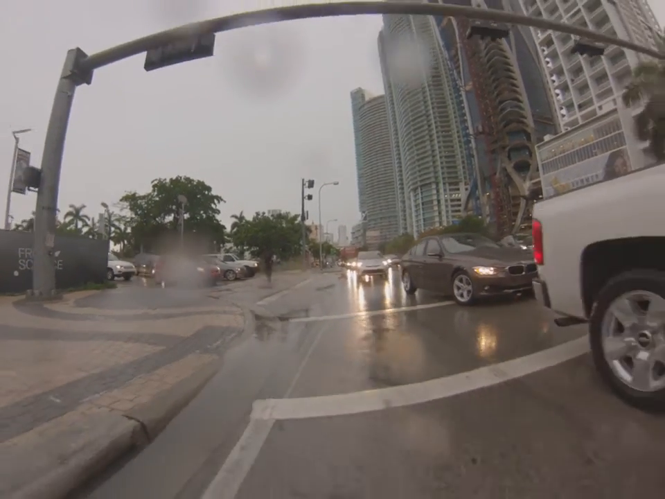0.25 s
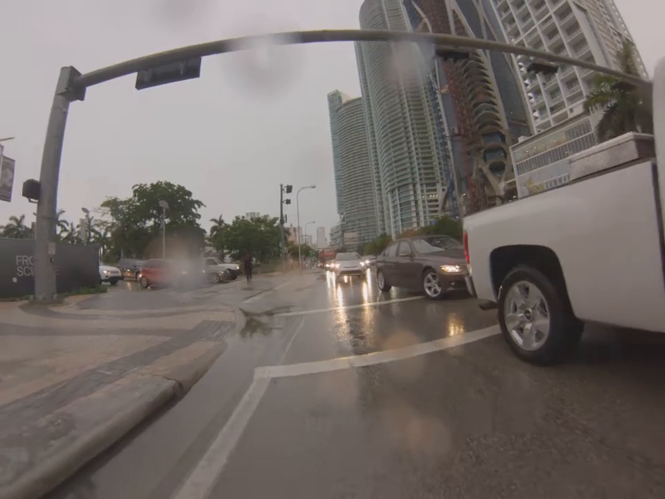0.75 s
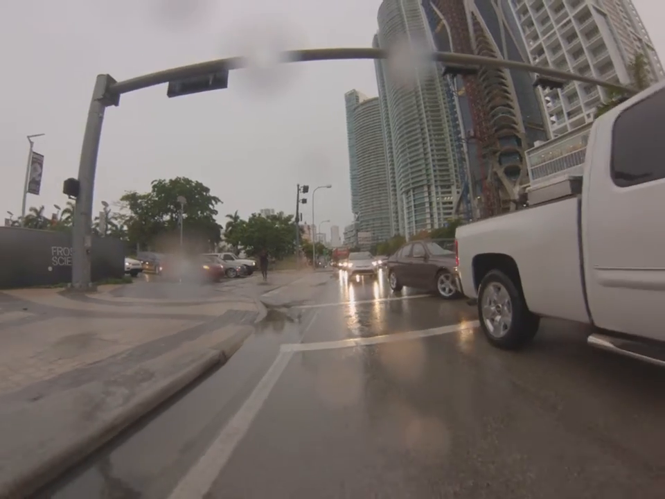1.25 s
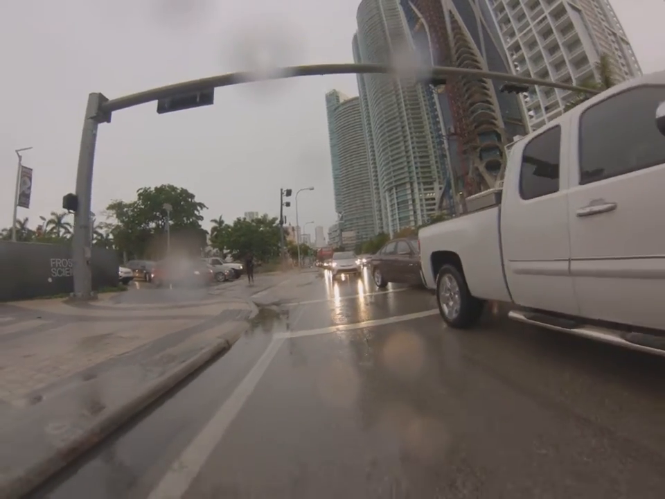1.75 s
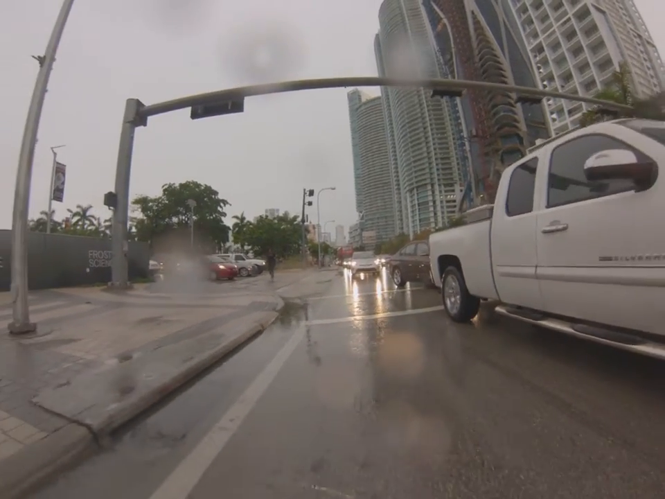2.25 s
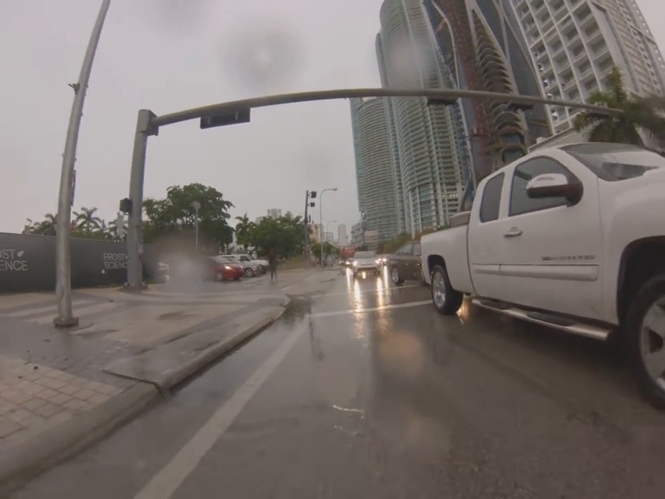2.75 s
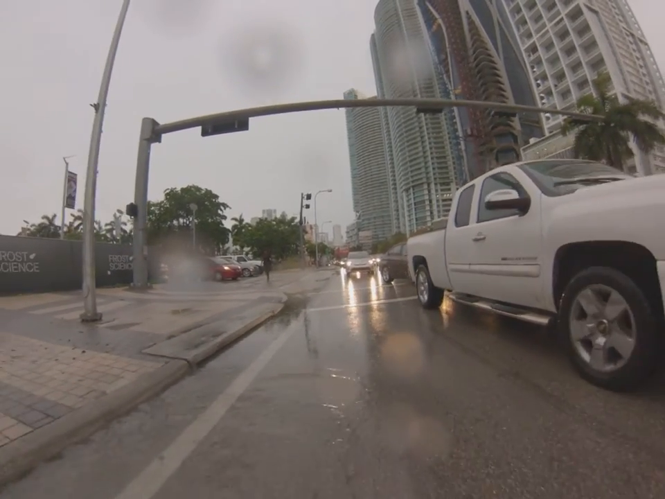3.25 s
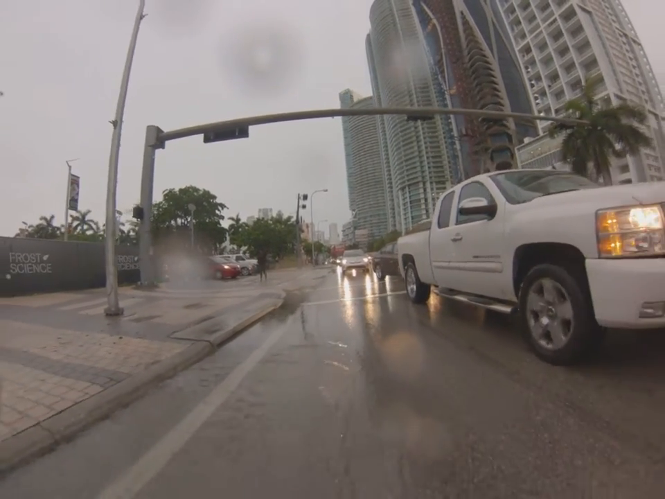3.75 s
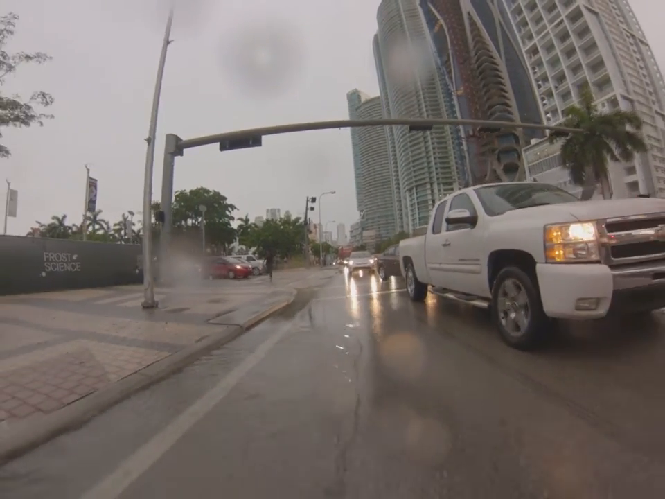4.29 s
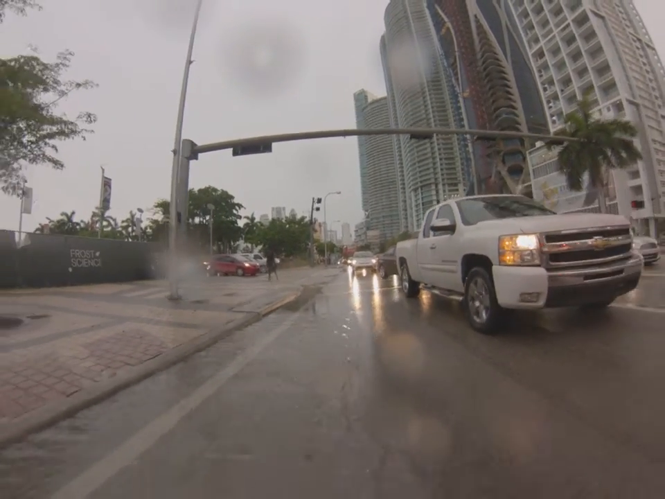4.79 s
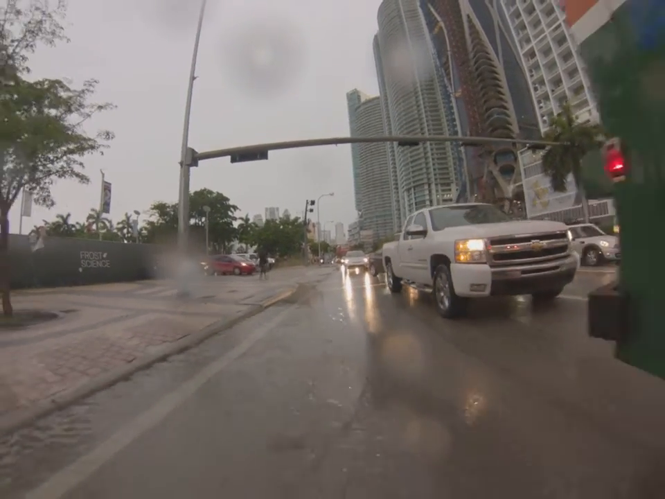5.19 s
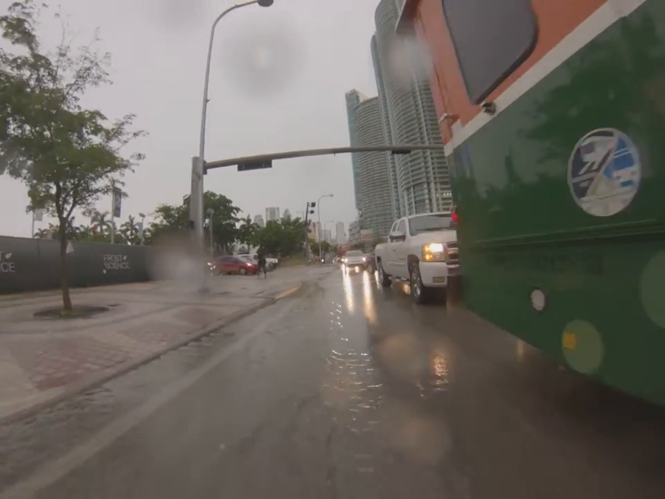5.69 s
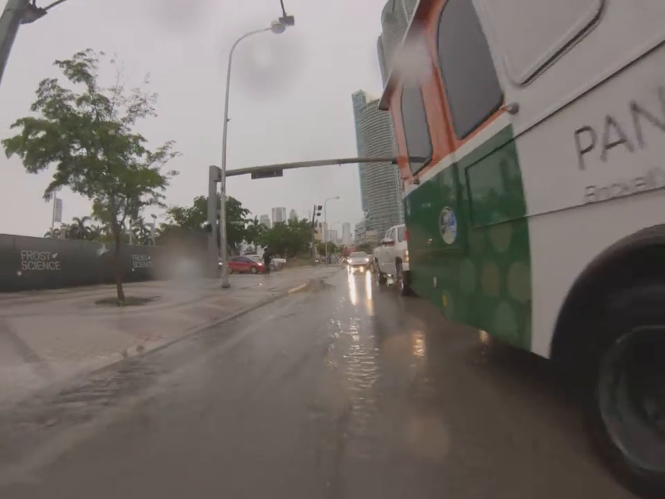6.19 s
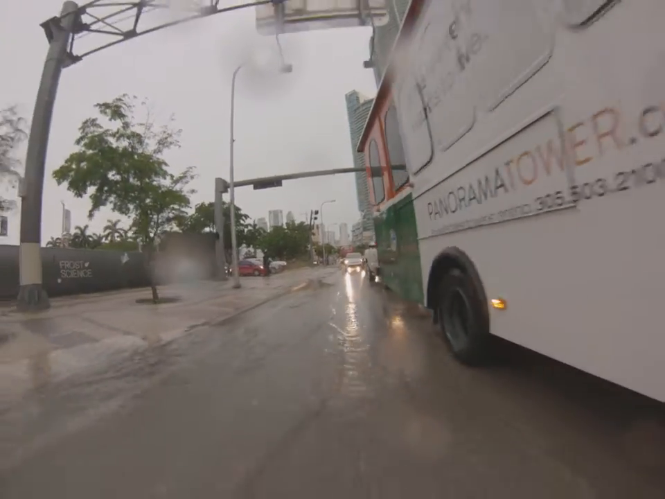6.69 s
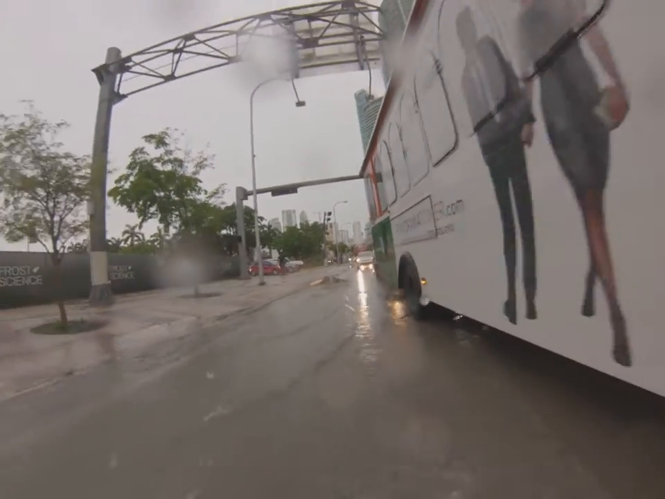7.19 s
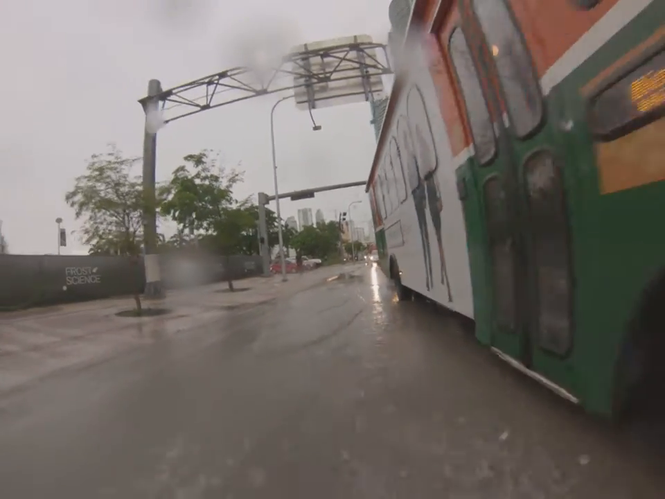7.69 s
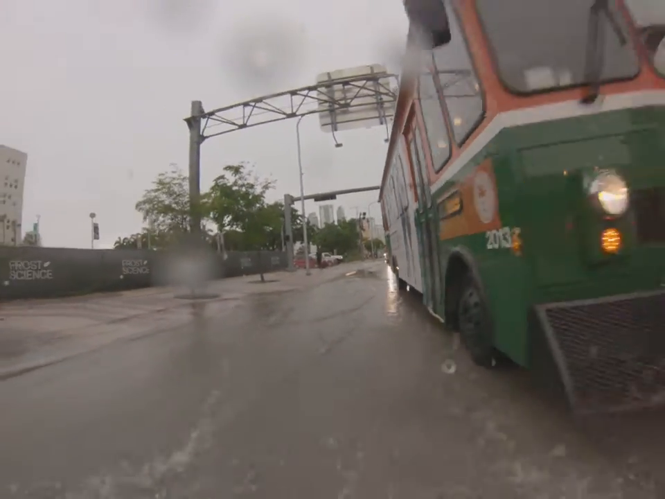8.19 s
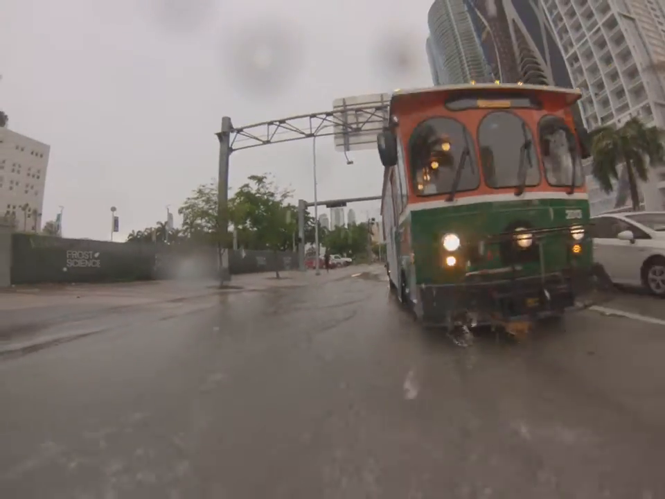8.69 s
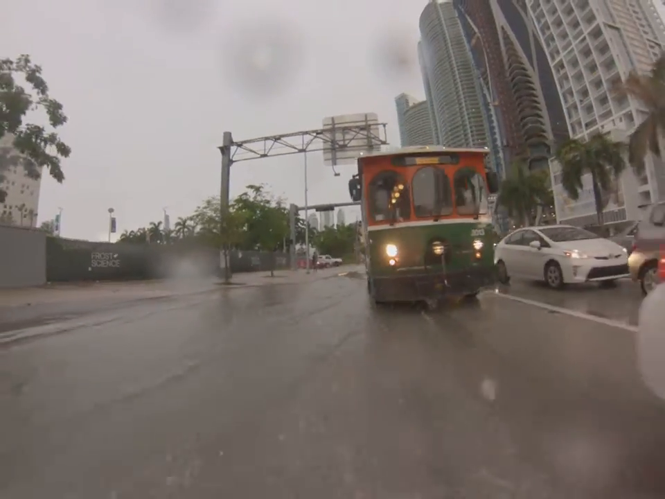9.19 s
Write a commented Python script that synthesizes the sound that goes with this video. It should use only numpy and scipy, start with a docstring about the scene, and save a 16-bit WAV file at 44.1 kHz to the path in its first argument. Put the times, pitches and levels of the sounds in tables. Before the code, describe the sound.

Close, booming motorcycle engine settles to idle, revs briefly, then rides off slowly through water as the microphone mount knocks and creaks.

```python
"""On a flooded street, a V-twin motorcycle is heard from a camera housing mounted on the bike.
It winds down to idle, gets a few small blips and one big one, then pulls away slowly. Periodic impulses
excite resonators: firings boom in the pipe, knocks thud in the frame, valves clatter in the crankcase.
Bodywork hums, a thin whine wavers at idle, wind rumbles and tyres hiss through the water.
Drops tick on the housing, which creaks at the hardest shakes and now and then snaps."""
import sys
import numpy as np
from scipy import signal
from scipy.io import wavfile
from scipy.ndimage import uniform_filter1d

SR = 44100
rng = np.random.default_rng(int(sys.argv[2]) if len(sys.argv) > 2 else 0)


def int16_out(signal):
    """Quantize to a 16-bit WAV file."""
    q = np.round(np.clip(np.atleast_2d(signal).T, -1, 1) * 32767)
    wavfile.write(sys.argv[1], SR, q.astype(np.int16))


N = 416744
T = np.arange(N) / SR

# Levels in all tables are relative: each layer applies its own gain.
# knocks in one four-stroke cycle: place_cycles, idle_thud_db, revved_thud_db, clack_db, jitter_s
CYCLE_KNOCKS = [(.01, -12, -13, -11, .0003), (.09, -16, -18, -9, .0003), (.26, -15, -5, -10, .0009),
                (.31, -11, -12, -7, .0002), (.385, -7, -6, -1, .0003), (.7, 2, 1, -13, .00005),
                (.745, -6, -18, -6, .0001), (.785, -3, -13, -8, .0001), (.85, -8, -11, -9, .0001),
                (.935, -11, -15, -10, .0002)]
# the housing's bright response to ticks and scrapes: frequency_hz, gain_db
SHELL_SPECTRUM = [(500, -23.5), (1500, 5.5), (3000, 6), (5000, 3), (10000, -4.5), (15000, -15.5)]


def gain_of(db):
    """Amplitude ratio of a level in decibels."""
    return 10 ** (np.asarray(db) / 20)


def unit_rms(x):
    """Normalises the overall rms to 1."""
    return x / np.sqrt(np.mean(x ** 2) + 1e-20)


def steadied(x, size=8000):
    """Holds the short-term rms at 1 and keeps the single beats."""
    power = uniform_filter1d(uniform_filter1d(x ** 2, size), size)
    return x / np.sqrt(abs(power) + 1e-12)


def curve(table, column=1):
    """Interpolates one column of a time table at every sample."""
    columns = np.transpose(table)
    return np.interp(T, columns[0], columns[column])


def colour(x, spectrum, size=32768):
    """Minimum-phase filter with the given magnitude spectrum."""
    hz, db = np.transpose(spectrum)
    log_hz = np.log(abs(np.fft.fftfreq(size, 1 / SR)) + 1)
    log_gain = np.log(gain_of(np.interp(log_hz, np.log(hz), db)))
    response = np.fft.ifft(np.exp(np.conj(signal.hilbert(log_gain)))).real
    return signal.oaconvolve(x, response[:size // 2])[:N]


def resonate(x, modes):
    """Modal superposition: each mode is a band-pass applied twice."""
    out = np.zeros(N)
    for hz, width_hz, db in modes:
        b, a = signal.iirpeak(hz, hz / (2 * width_hz), SR)
        out += gain_of(db) * signal.lfilter(b, a, signal.lfilter(b, a, x))
    return out


def noise():
    """White Gaussian noise."""
    return rng.standard_normal(N)


def wander(hz):
    """Random modulation of rms 1, mostly below the given rate."""
    return unit_rms(np.interp(2 * hz * T, np.arange(1024), rng.standard_normal(1024)))


def beats(turns, place, scatter_db, jitter_s):
    """Quasi-periodic impulses: one per engine cycle, scattered in strength and timing."""
    at = np.flatnonzero(np.diff(np.floor(turns - place)) > 0)
    strength, lateness = rng.standard_normal((256, 2))[:len(at)].T
    at = np.clip(at + (lateness * jitter_s * SR).astype(int), 0, N - 1)
    out = np.zeros(N)
    out[at] = gain_of(scatter_db * np.minimum(strength, 1.3))
    return out


def strikes(table, column=1, delay_s=0):
    """One impulse per row, with its level in dB taken from the given column."""
    out = np.zeros(N)
    for row in table:
        out[round((row[0] + delay_s) * SR)] = gain_of(row[column])
    return out


def rattled(impulses, decay_s, bed):
    """Each impulse starts exponentially decaying noise, adding in power to a steady bed."""
    power = signal.lfilter([1], [1, -np.exp(-2 / (decay_s * SR))], impulses ** 2)
    return np.sqrt(power + bed ** 2) * noise()


def bursts(impulses, sigma_s, size):
    """Spreads each impulse into a noise burst with a Gaussian envelope."""
    return signal.oaconvolve(impulses, signal.windows.gaussian(size, sigma_s * SR), "same") * noise()


def rider():
    """Engine speed and throttle: each blip winds the engine up, then it coasts back."""
    # winding down, idling, pulling away: time_s, speed_rpm, throttle_fraction
    ride = [(0, 2017.6, .5), (.3, 1584.2, 0), (.6, 1358.9, 0), (1.3, 1331.8, 0), (1.8, 1324.8, 0),
            (2.5, 1330.9, 0), (3, 1282.5, 0), (3.3, 1334, .03), (3.9, 1359.2, .09), (4.3, 1351, .13),
            (4.55, 1421.2, .2), (4.85, 1509.3, .48), (5.1, 1725.1, .7), (5.3, 1760.4, .85),
            (5.6, 1703.8, .87), (6.3, 1640.1, .9), (6.7, 1687.3, .76), (7.4, 1816.3, .55), (8, 1869.5, .6),
            (8.8, 1939.5, .65), (9.45, 1978.4, .7)]
    # added twists of the throttle: start_s, length_s, gained_rpm, opening_fraction
    blips = [(1.17, .15, 20, .5), (3.265, .373, 259, .5), (3.823, .46, 207, .6), (4.541, .349, 639, .5)]
    twist_s, rev_up_s, coast_rpm_per_s = .06, .189, 2200
    rpm, throttle = curve(ride), curve(ride, 2)
    for start, length, gained_rpm, opening in blips:
        end = start + length
        rise = gained_rpm * (T - start) / rev_up_s
        fall = gained_rpm - coast_rpm_per_s * (T - end)
        rpm += np.clip(np.minimum(rise, fall), 0, gained_rpm)
        throttle += opening * np.clip(1 + np.minimum(T - start, end - T) / twist_s, 0, 1)
    return rpm, np.clip(throttle, 0, 1)


def exhaust(turns, throttle, pace):
    """Pipe resonance: two unevenly spaced firings drive a boom, with gas rumble and a bark under load."""
    # spectra of the pipe, the bark and the rough gas flow: frequency_hz, gain_db
    pipe_spectrum = [(12, -51.5), (22, -37), (30, -9), (40, 4), (50, 2), (59, 10.5), (68, 0.5), (80, -13.5),
                     (92, -11), (112, -22.5), (145, -26.5), (200, -34.5), (400, -53), (900, -100.5)]
    bark_spectrum = [(150, -23), (270, -5), (450, 10.5), (560, 1), (720, -14), (850, -3), (1020, -5.5),
                     (1130, -4), (1400, 1), (2400, -27), (4000, -52.5)]
    rumble_spectrum = [(50, -30), (95, -4), (135, 5.5), (190, -2), (260, -16), (600, -60)]
    # envelope of the boom: time_s, level_db
    boom_levels = [(0.0, -30), (0.2, -31.5), (0.4, -26.5), (0.65, -30), (1.3, -23.5), (1.38, -27.5),
                   (3.22, -27), (3.38, -21), (3.53, -29), (3.8, -20.5), (4.38, -27), (4.58, -22),
                   (4.95, -20.5), (5.1, -26.5), (5.32, -23), (7.0, -26.5), (9.38, -24.5), (9.45, -26)]
    front_cycles, gap_cycles, pipe_lag_s, bark_lag_s = .93, .385, .009, .016
    front = beats(turns, front_cycles, scatter_db=.8, jitter_s=.0002)
    rear = beats(turns, front_cycles + gap_cycles, scatter_db=.8, jitter_s=.0002)
    firings = front + rear * np.interp(throttle, [.35, .9], [.95, .5])  # the front leads under load
    boom_db = curve(boom_levels)
    boom = np.roll(steadied(colour(firings, pipe_spectrum)), round(pipe_lag_s * SR))
    boom *= gain_of(boom_db - 2.5 + .5 * wander(hz=8.4))
    puffs = unit_rms(firings ** 2) + 1.2 * unit_rms(rattled(firings ** 2, decay_s=.0042, bed=.018))
    bark = np.roll(steadied(colour(puffs, bark_spectrum)), round(bark_lag_s * SR))
    bark *= gain_of(-74.5 + 16.5 * throttle + 6 * pace)
    rumble = steadied(colour(noise(), rumble_spectrum)) * gain_of(-48.5 + 1.31 * (boom_db + 20))
    return boom + rumble + bark


def frame(turns, rev_octaves, throttle, pace):
    """Impact excitation: engine knocks ring frame and fairing, their balance shifting with speed."""
    # response of the frame: frequency_hz, gain_db
    frame_spectrum = [(70, -29.5), (130, -15.5), (190, -1), (250, 2.5), (330, 2.5), (440, 3.5), (540, -16),
                      (750, -23), (1200, -14.5), (2400, -26.5), (4000, -60)]
    # fairing resonances: frequency_hz, width_hz, gain_db
    fairing_modes = [(186, 17, -3), (323, 65, 0), (420, 43, -6.5), (672, 22, -9.5)]
    revved = np.clip(rev_octaves / .3, 0, 1)
    blows = np.zeros(N)
    for place, idle_db, revved_db, _, jitter_s in CYCLE_KNOCKS:
        strength = gain_of(idle_db + revved * (revved_db - idle_db))
        blows += strength * beats(turns, place, scatter_db=.9, jitter_s=jitter_s)
    force = unit_rms(blows) + .28 * unit_rms(rattled(blows, decay_s=.008, bed=.07))
    thud = unit_rms(colour(force, frame_spectrum))
    fairing = gain_of(-6.5) * unit_rms(resonate(force, fairing_modes))
    level_db = -55.5 + 6.5 * rev_octaves + 1.5 * throttle + 1.5 * pace
    return steadied(thud + fairing, size=12000) * gain_of(level_db)


def valve_blows(turns, scatter_db):
    """The valve gear's impacts, repeating each cycle."""
    return sum(gain_of(db) * beats(turns, place, scatter_db, jitter_s=.0004)
               for place, _, _, db, _ in CYCLE_KNOCKS)


def valves(turns):
    """Modal ringing: valve impacts and a loose rattle excite the crankcase; a few clacks stand out."""
    # crankcase resonances: frequency_hz, width_hz, gain_db
    crankcase_modes = [(1489, 87, 3.5), (1586, 35, -2), (1787, 43, -13), (2476, 70, -9.5), (2868, 64, -15)]
    # envelope of the clatter: time_s, level_db
    clatter_levels = [(0.0, -49), (1.72, -51.5), (1.95, -49), (2.53, -53), (2.68, -53.5), (3.18, -52),
                      (3.45, -48.5), (3.88, -56.5), (4.82, -46), (4.93, -54), (6.55, -51), (6.82, -46.5),
                      (8.9, -48.5), (9.45, -47.5)]
    # the hardest clacks: start_s, level_db
    clacks = [(0.833, -41), (0.923, -49), (0.985, -41), (1.0105, -49), (1.098, -46), (1.459, -38),
              (1.545, -43), (1.8194, -41), (1.941, -42), (2.0023, -38), (2.1842, -43), (2.7246, -38.5),
              (2.9103, -38), (3.2786, -42), (3.307, -43), (3.6698, -39.5), (4.567, -39), (4.699, -37),
              (4.8105, -39), (6.8745, -33.5), (6.97, -39), (7.1487, -38), (7.4826, -35), (8.345, -36),
              (8.758, -45)]
    blows = valve_blows(turns, scatter_db=1.5)
    force = unit_rms(blows) + .9 * unit_rms(rattled(blows, decay_s=.014, bed=.15))
    clatter = steadied(resonate(force, crankcase_modes)) * gain_of(curve(clatter_levels) - 4)
    return clatter + gain_of(35.5) * resonate(strikes(clacks), crankcase_modes)


def idle_whine(throttle):
    """Phase modulation: a thin whine, perhaps the fuel pump, wavers at random beside a light chatter; both fade
    under load."""
    # the idle whine: time_s, pitch_hz, level_db
    whine_track = [(0, 768, -69), (.4, 747, -70.5), (.8, 773, -64), (1.15, 768, -66.5), (1.5, 756, -63),
                   (2, 760, -65), (2.6, 748, -66), (3.2, 728, -64.5), (3.5, 740, -75.5), (5, 776, -78),
                   (6, 778, -110)]
    # broad resonance of the light chatter: frequency_hz, width_hz, gain_db
    chatter_modes = [(750, 770, 0.0084)]
    phase = 2 * np.pi * np.cumsum(curve(whine_track)) / SR + wander(hz=21.47)
    chatter = gain_of(-56.5) * (1 - throttle) * noise()
    whine = np.sin(phase) * gain_of(curve(whine_track, 2) + .93 * wander(hz=8.4))
    return whine + resonate(chatter, chatter_modes)


def final_drive(pace, throttle):
    """Tooth meshing: the rear drive's whine rises in pitch with pace and in level with load."""
    full_pace_hz = 402.5
    phase = 2 * np.pi * np.cumsum(full_pace_hz * pace) / SR + .7 * wander(hz=17)
    return (np.sin(phase) + gain_of(-5.5) * np.sin(2 * phase)) * gain_of(-76.5 + 18.5 * throttle)


def wash(turns, rev_octaves, water):
    """Modulated noise: engine rasp rides on the wet street's hiss and rings the housing's modes."""
    # spectrum of rasp and hiss: frequency_hz, gain_db
    wash_spectrum = [(150, -4.5), (500, 1.5), (1000, 0.5), (1150, 5.5), (1400, 7.5), (1900, 1.5), (2200, 2),
                     (2500, -2.5), (2750, -7.5), (3100, -14.5), (3800, -12.5), (4300, -21), (4750, -35),
                     (7000, -47), (11000, -61)]
    # hollow resonances of the housing: frequency_hz, width_hz, gain_db
    housing_modes = [(2472, 36, 13.5), (2950, 140, 7), (3356, 110, 5.5), (3644, 59, 0.5), (4550, 26, -13),
                     (5048, 88, -5), (6950, 130, -17.5)]
    rasp = steadied(rattled(valve_blows(turns, scatter_db=6), decay_s=.012, bed=1))
    hiss = gain_of(4.5) * unit_rms(colour(rasp, wash_spectrum))
    rings = gain_of(-7) * unit_rms(resonate(rasp, housing_modes))
    return (hiss + rings) * gain_of(-62.5 + 3 * rev_octaves + 6 * water)


def spray(water):
    """Shot noise: droplets flung by the tyres fizz, flare in puddles and crackle in deep water."""
    # spectrum of the spray: frequency_hz, gain_db
    spray_spectrum = [(2500, -12.5), (4000, 0), (5500, 1), (7500, -3), (8500, -8.5), (11500, -9.5),
                      (14000, -38)]
    # puddles under the front tyre: centre_s, half_length_s, boost_db
    puddles = [(3.22, .035, 15), (3.88, .03, 10), (4.12, .025, 6)]
    drops_per_s, splats_per_s = 3000, 110 * water ** 4
    arrivals = rng.random(N) < drops_per_s / SR
    drops = arrivals * gain_of(2.2 * np.minimum(rng.exponential(1, N), 4)) * noise()
    splats = (rng.random(N) < splats_per_s / SR) * rng.uniform(-1, 1, N)
    fizz = unit_rms(drops) + noise() + gain_of(-9) * unit_rms(splats)
    splash_db = sum(db * np.exp(-((T - centre) / half) ** 2) for centre, half, db in puddles)
    level_db = -100 + 22 * water + splash_db + .8 * wander(hz=9)
    return unit_rms(colour(fizz, spray_spectrum)) * gain_of(level_db)


def wind(pace):
    """Turbulence: low, lumpy buffeting grows as the bike gathers speed."""
    # spectrum of the buffeting: frequency_hz, gain_db
    wind_spectrum = [(12, -25), (24, -12), (32, -9), (45, -5), (60, -4.5), (100, -19), (150, -26),
                     (500, -39.5), (1500, -91)]
    return unit_rms(colour(noise(), wind_spectrum)) * gain_of(-41.5 + 6.5 * pace + 1.4 * wander(hz=6.4))


def bodywork_hum(turns, rpm):
    """Forced vibration: shaft orders hum in the bodywork, one mix at idle and another when cruising."""
    # shaft orders: cycle_rate_multiple, idle_db, cruise_db
    orders = [(5, -60, -50), (6, -58, -46), (8, -47, -63), (13, -58, -62), (13.4, -80, -51), (17, -59, -68),
              (20, -80, -60), (21, -72, -56), (22, -72, -54), (27, -63, -63), (30, -62, -75),
              (31, -68, -62), (41, -85, -69), (42, -85, -71)]
    # cruising hum, greatest as engine speed meets the bodywork's resonance: time_s, strength_fraction
    cruise_swell = [(6.3, 0), (6.9, .75), (7.6, 1), (8.2, .85), (8.7, .55), (9.45, .35)]
    idling = np.interp(rpm, [1370, 1520], [1, 0])
    cruising = curve(cruise_swell)
    hum = np.zeros(N)
    for order, idle_db, cruise_db in orders:
        amplitude = idling * gain_of(idle_db) + cruising * gain_of(cruise_db + .5)
        drift = 2 * np.pi * rng.random() + .6 * wander(hz=1.2) + .3 * wander(hz=9)
        hum += amplitude * gain_of(1.3 * wander(hz=5)) * np.sin(2 * np.pi * order * turns + drift)
    return hum


def drips():
    """Impulse response: each drop landing on the housing gives a bright tick."""
    # drop impacts: start_s, level_db
    landings = [(.5498, -44), (1.9895, -47), (5.85, -49.5), (6.1366, -46), (6.37, -48), (6.65, -50),
                (7.23, -51), (7.9, -52), (7.95, -53), (8.64, -51)]
    return colour(strikes(landings), SHELL_SPECTRUM)


def mount(boom):
    """Stick-slip friction: the mount creaks and knocks when shaken, and sizzles at the boom's peaks."""
    # the hardest shakes: start_s, creak_db, knock_db
    shakes = [(2.244, -79, -44), (3.337, -61, -46.5), (3.3894, -62, -45), (3.593, -61, -48.5),
              (3.772, -60, -46), (3.8658, -72, -49), (3.942, -56, -53), (3.982, -60, -56),
              (4.059, -65, -43), (4.169, -64, -43.5), (4.583, -65, -45.5), (4.611, -59, -44.5),
              (4.7726, -63, -40.5), (4.8193, -56.5, -50), (4.8735, -58, -44), (4.931, -59, -60),
              (4.995, -61, -60), (5.0486, -64, -46), (5.286, -63, -43), (5.358, -59, -41.5),
              (5.429, -63, -44), (5.504, -67, -44), (5.688, -77, -43), (5.853, -70, -47), (5.898, -80, -42),
              (5.966, -80, -48), (6.039, -83, -51.5), (6.142, -69, -47), (6.546, -75, -44.5),
              (6.592, -77, -44), (6.689, -75, -42.5), (7.374, -76, -47), (7.875, -73, -44),
              (8.13, -75, -44.5), (8.471, -78, -41), (8.761, -62, -39.5), (9.3153, -57.5, -39.5),
              (9.386, -62, -56)]
    # spectrum of the mount's dull knock: frequency_hz, gain_db
    knock_spectrum = [(120, -12.5), (270, 8.5), (450, 8), (700, -6.5), (950, -3.5), (1300, -1),
                      (2400, -15.5), (4000, -28), (6000, -50)]
    swing_back_s, sizzle_threshold_db = .0097, -16
    slips = strikes(shakes) + gain_of(.5) * strikes(shakes, delay_s=swing_back_s)
    scrape = gain_of(-1.5) * bursts(slips, sigma_s=.00078, size=801)
    wet_fizz = gain_of(-21.5) * bursts(slips, sigma_s=.011, size=4001)
    knocks = gain_of(12.5) * bursts(strikes(shakes, column=2), sigma_s=.0029, size=1201)
    strain = np.clip(abs(boom) / gain_of(sizzle_threshold_db) - 1, 0, .4)
    sizzle = gain_of(-64) * strain * noise()
    return colour(scrape + wet_fizz + sizzle, SHELL_SPECTRUM) + colour(knocks, knock_spectrum)


def snaps():
    """Transient excitation: each snap of the housing gives a sharp crack and a hollow thump."""
    # snaps of the housing: start_s, crack_db, thump_db
    events = [(3.5936, -51, -44), (3.772, -47, -39), (3.819, -42, -39), (4.1685, -58, -44),
              (4.626, -50, -35), (4.8193, -53, -39), (4.884, -52, -37), (5.2655, -33, -16)]
    # spectrum of the thump: frequency_hz, gain_db
    thump_spectrum = [(60, -8), (170, 6), (300, 3), (600, -2.5), (1100, -9), (2000, -7.5), (4000, -30)]
    return colour(strikes(events), SHELL_SPECTRUM) + colour(strikes(events, column=2), thump_spectrum)


def scene():
    """Superposition: engine speed, throttle, pace and road water shape the running layers."""
    # the bike's pace: time_s, fraction_of_fastest
    pace_track = [(0, .66), (.6, .29), (3, .37), (4.5, .41), (5.05, .5), (5.5, .665), (6.1, .86),
                  (6.7, .96), (9.45, 1)]
    # water thrown up by the tyres: time_s, fraction_of_most
    water_track = [(0, 0.6), (.6, 0.1), (3, 0.2), (4.5, 0.4), (5.5, .58), (6.5, 0.8), (7.2, 0.95), (8, 1),
                   (8.9, .9), (9.45, .97)]
    idle_rpm, start_cycles = 1330, .577
    rpm, throttle = rider()
    pace, water = curve(pace_track), curve(water_track)
    rev_octaves = np.log2(rpm / idle_rpm)
    turns = start_cycles + np.cumsum(rpm) / (120 * SR)  # engine cycles, two revolutions each
    boom = exhaust(turns, throttle, pace)
    engine = boom + frame(turns, rev_octaves, throttle, pace) + bodywork_hum(turns, rpm)
    machinery = valves(turns) + idle_whine(throttle) + final_drive(pace, throttle)
    street = wash(turns, rev_octaves, water) + spray(water) + wind(pace)
    housing = drips() + mount(boom) + snaps()
    return (engine + machinery + street + housing)[None]


def record(dry):
    """Destructive interference: echoes in the housing cut two bands; the camera limits the treble."""
    # notches of the housing: frequency_hz, width_hz
    notches = [(2715, 170), (3075, 260)]
    cutoff_hz = 15000
    for hz, width_hz in notches:
        dry = .25 * dry + .75 * signal.lfilter(*signal.iirnotch(hz, hz / width_hz, SR), dry)
    low_pass = signal.firwin(255, cutoff_hz, window=("kaiser", 9), fs=SR)
    return signal.oaconvolve(dry, low_pass[None], "same")


dry = scene()
out = record(dry)
int16_out(out)
```